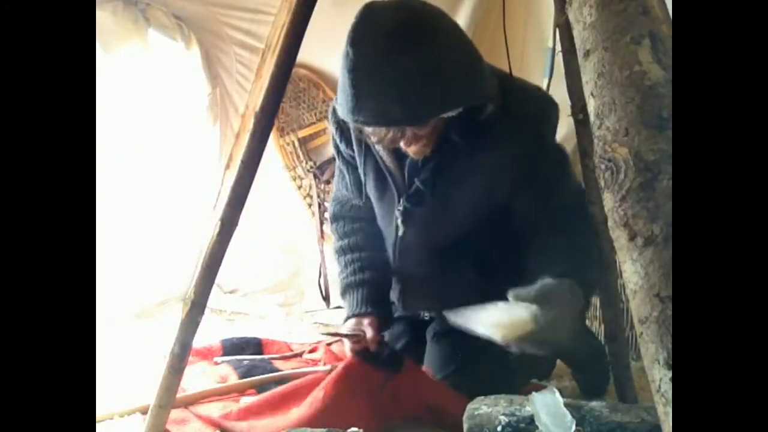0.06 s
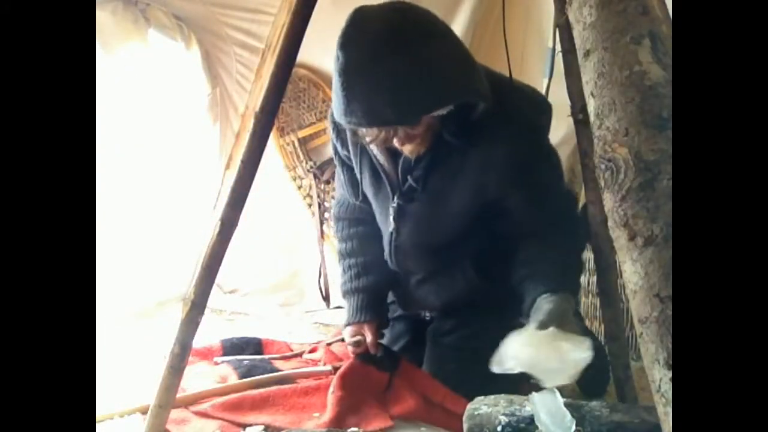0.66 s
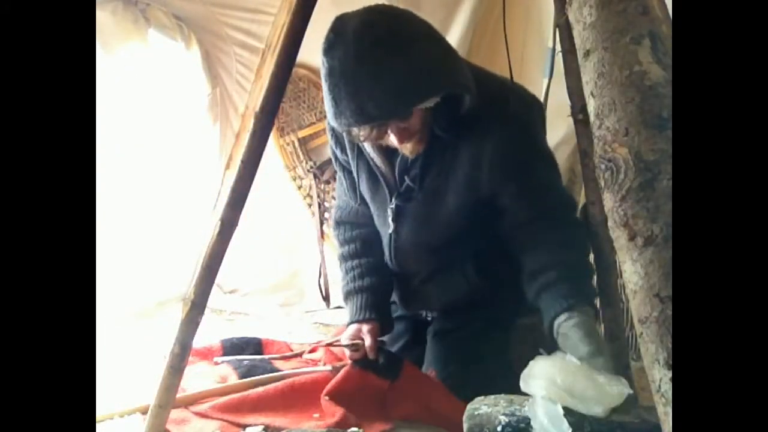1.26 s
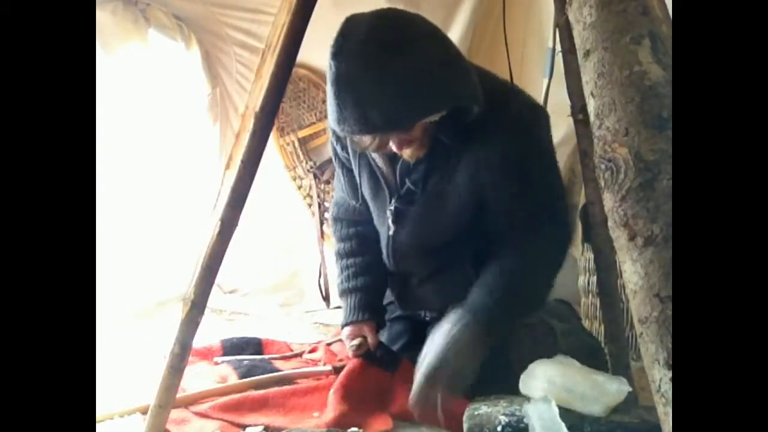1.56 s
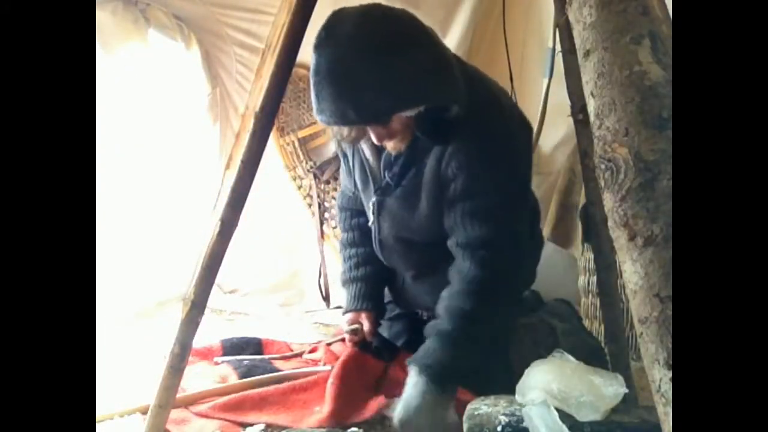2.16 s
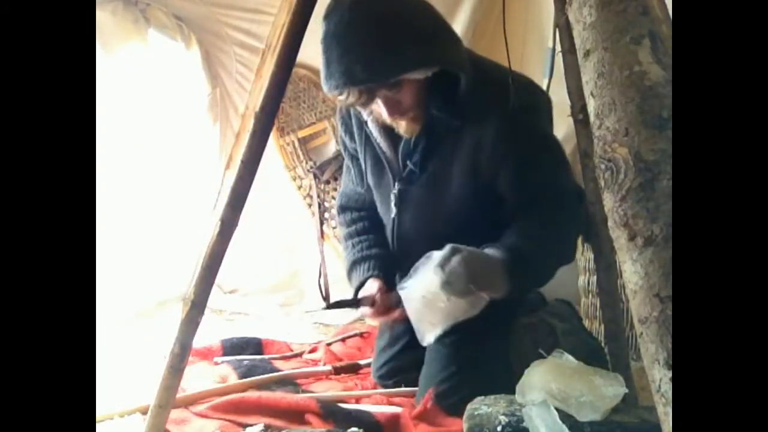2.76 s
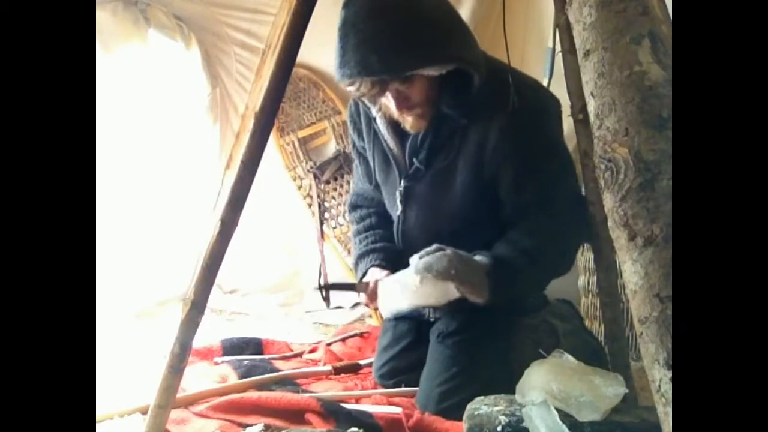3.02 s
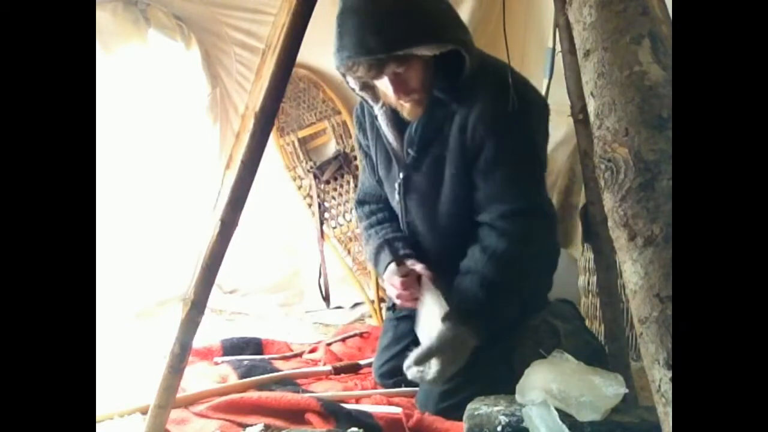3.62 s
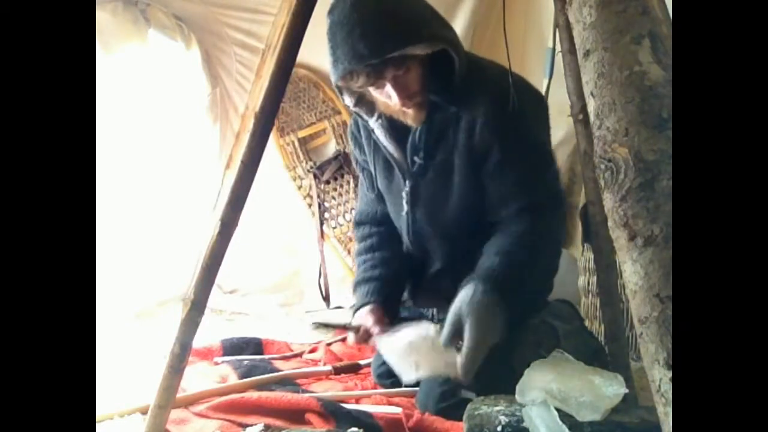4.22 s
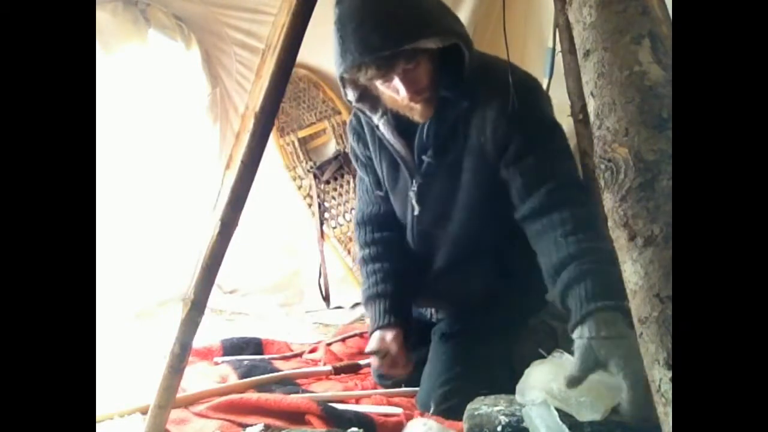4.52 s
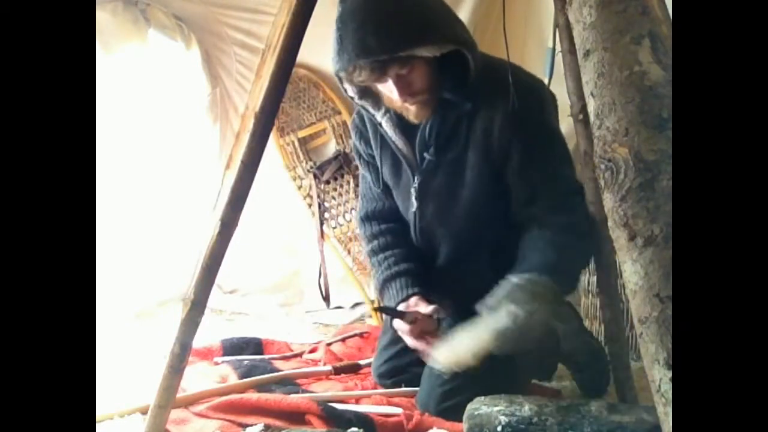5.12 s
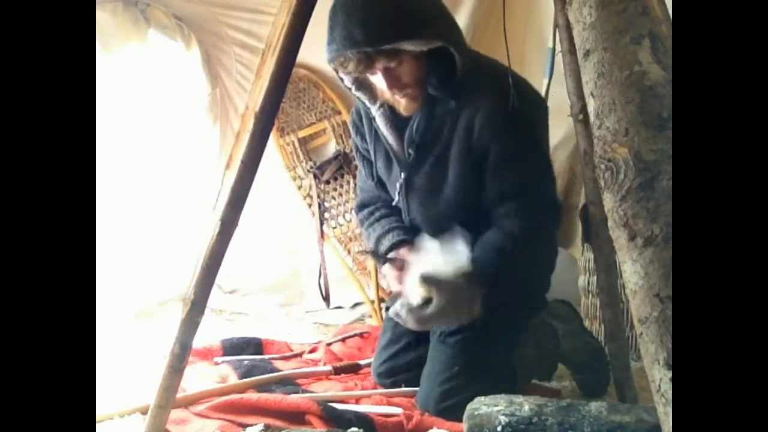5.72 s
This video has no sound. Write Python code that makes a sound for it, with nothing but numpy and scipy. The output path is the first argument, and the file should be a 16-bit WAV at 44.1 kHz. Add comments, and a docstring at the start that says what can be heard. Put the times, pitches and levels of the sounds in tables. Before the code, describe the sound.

A thick block of ice ticks and chips lightly at the start, then is set on a stone with a sharp, high clink at about 1.1 seconds, followed by dull knocks and short gritty scrapes until 1.7. Gloves and a heavy jacket rustle softly from 1.8 to 2.5. Faint ticks come near 3.1, and a knife taps a thin slab of ice at about 4.2. At 4.5 the slab hits the pile with the loudest sound, a bright, splintering crack, and its pieces bounce with brief ringing clinks and knocks. From 4.7 to 5.2 the block is dragged off the stone with scrapes, small tinks and glove rubbing. At 5.5 it strikes the knife with a strong, lower ringing clack, followed by two small snaps. Everything dies away quickly in the canvas shelter, over a quiet hiss and a faint low drone that swells near the end.

```python
"""Handling ice in a canvas shelter

A thick block scrapes and clinks as it is set down on a stone. A thin slab is picked up, touched with
a knife and tossed onto the pile, where it cracks and its pieces bounce, each ringing with its own notes.
The block is dragged off and knocks against the knife. Gloves rustle over a quiet hiss and a low drone."""
import sys
import numpy as np
from scipy import signal
from scipy.fft import rfft, irfft, next_fast_len
from scipy.io import wavfile
from scipy.ndimage import map_coordinates

SR = 44100
rng = np.random.default_rng(int(sys.argv[2]) if len(sys.argv) > 2 else 0)


def dump_mix(stems):
    """Bounce the given channels to the path in sys.argv[1] as a 16-bit WAV at rate SR."""
    frames = np.atleast_2d(stems).T  # one column per channel
    limited = np.clip(frames, -1, 1)  # hard clip at full scale
    pcm = np.round(limited * 32767).astype(np.int16)
    wavfile.write(sys.argv[1], SR, pcm)


N = 254898
TIME = np.arange(N) / SR
AGE = np.arange(SR // 4) / SR  # seconds since a hit


def amp(db):
    """Turn decibels into a gain."""
    return 10 ** (np.asarray(db) / 20)


def unit(x):
    """Scale a sound to an average power of 1."""
    return x / np.sqrt(np.mean(x ** 2) + 1e-20)


def fade(t60):
    """Die away by 60 dB in t60 seconds."""
    return np.exp(-np.log(1000) * AGE / t60)


def add(track, t, sound):
    """Mix a sound in at t seconds."""
    part = track[max(round(t * SR), 0):][:len(sound)]
    part += sound[:len(part)]


def shape(points, hz):
    """Read the gain at hz from a tone colour: a curve of level against frequency."""
    f, db = np.transpose(points)
    return amp(np.interp(np.log(hz + 1), np.log(f), db))


def filtered(x, response):
    """Scale each frequency in x by response(hz)."""
    size = next_fast_len(len(x) + 8192)
    return irfft(rfft(x, size) * response(np.fft.rfftfreq(size, 1 / SR)), size)[:len(x)]


def noise(response, size):
    """Filtered noise with a power of 1."""
    return unit(filtered(rng.standard_normal(size), response))


def wobble(rate):
    """A smooth curve through `rate` random values a second."""
    return map_coordinates(rng.standard_normal(int(N * rate / SR) + 4), [TIME * rate])


def grains(rate, spread_db):
    """About `rate` tiny random clicks a second, a few much louder than the rest."""
    clicks = rng.random(N) < rate / SR
    return clicks * rng.standard_normal(N) * amp(spread_db * np.minimum(rng.exponential(size=N), 3))


def ring(notes, vary_db, blur, build_t60):
    """A struck object's own notes die away; nearby echoes build each one up and make it waver."""
    hz, db, t60 = np.transpose(notes)[:, :, None]
    gain = amp(db + vary_db * rng.standard_normal(db.shape))
    waver = signal.resample(rng.standard_normal((len(notes), 2, 60)), len(AGE), axis=2)
    phase = 2 * np.pi * (hz * AGE + rng.random(hz.shape))
    tones = (1 + blur * waver[:, 0]) * np.sin(phase) + blur * waver[:, 1] * np.cos(phase)
    return np.sum(gain * fade(t60) * tones, axis=0) * (1 - fade(build_t60)) / np.linalg.norm(gain)


# Tone colour of the hiss: f/Hz, level/dB
HISS_COLOUR = [(30, -16.5), (80, -9.5), (130, -5.5), (225, -2), (360, -5), (700, -6.5), (1900, -12),
               (4000, -14), (6200, -14.5), (7700, -10), (9200, -19.5), (12000, -18), (15500, -15.5)]
# The drone's two notes: f/Hz, level/dB
DRONE_NOTES = [(134.6, -5.5), (215, -8.5)]
# How the drone dips and swells: t/s, level/dB
DRONE_SWELL = [(0, -69.5), (3.5, -76.5), (4.9, -65), (5.2, -62.5), (5.78, -62)]
def background():
    """A steady hiss and a low, slightly unsteady drone that swells near the end."""
    drone = sum(amp(db + wobble(5.2)) * np.sin(2 * np.pi * hz * TIME + 0.5 * wobble(10))
                for hz, db in DRONE_NOTES)
    swell = amp(np.interp(TIME, *np.transpose(DRONE_SWELL)))
    hiss = amp(-63) * noise(lambda hz: shape(HISS_COLOUR, hz), N)
    return hiss + np.sqrt(2) * swell * drone


def strokes(moves):
    """Loudness of movements that each speed up and slow down in one smooth arc."""
    return sum(amp(db) * np.cos(np.pi * np.clip((TIME - t) / length, -.5, .5)) for t, length, db in moves)


# Glove strokes and leans of the body: middle t/s, length/s, level/dB
GLOVE_STROKES = [(0.1, 0.15, -61), (0.28, 0.045, -70), (1.79, 0.099, -56), (1.89, 0.14, -54.5),
                 (2.01, 0.22, -57.5), (2.1, 0.075, -59.5), (2.18, 0.11, -58), (2.28, 0.11, -57),
                 (2.372, 0.067, -56.5), (2.48, 0.17, -64), (2.83, .1, -64), (3.485, 0.083, -58.5),
                 (3.75, 0.27, -65), (4.32, 0.18, -64), (4.67, 0.26, -46), (4.98, 0.52, -53.5),
                 (5.44, 0.14, -63), (5.6, 0.074, -54), (5.7, .14, -57.5)]
BODY_LEANS = [(0.1, 1.23, -68), (1.4, 1.1, -65), (2.4, 1.5, -73.5), (4.8, 1.67, -64), (5.7, 0.88, -69.5)]
# Tone colours of the gloves and the heavy jacket: f/Hz, level/dB
GLOVE_COLOUR = [(300, -3.5), (1500, -9.5), (3500, -8.5), (5500, -5), (7700, 6), (9200, -3.5), (12500, -8.5),
                (15500, -10)]
JACKET_COLOUR = [(70, -29), (150, -2), (220, 4), (320, -11.5), (500, -17), (1500, -25), (4000, -23.5)]
def clothing():
    """Gloves rub over frosty ice and a blanket in tiny slips; the jacket shifts as the body leans."""
    slips = grains(rate=5000, spread_db=2.2) * amp(2 * wobble(70))
    rub = unit(filtered(slips, lambda hz: shape(GLOVE_COLOUR, hz)))
    jacket = noise(lambda hz: shape(JACKET_COLOUR, hz), N)
    return strokes(GLOVE_STROKES) * rub + strokes(BODY_LEANS) * jacket


# Tone colour of a stone on soft ground: f/Hz, level/dB
THUD_COLOUR = [(50, -28), (110, -17), (200, -3.5), (290, -8.5), (400, -9.5), (620, -5), (950, -13.5),
               (1400, -3), (2100, -11.5), (5000, 10)]
# Notes of the stone rocking: f/Hz, level/dB, fade time/s
STONE_NOTES = [(205, -6, .1), (272, 0, .11), (325, -8, .08)]
def knock(bright_hz):
    """A dull blow clatters and rocks the stone. A softer blow is darker and thumps more."""
    thud = noise(lambda hz: shape(THUD_COLOUR, hz) / (1 + (hz / bright_hz) ** 4), len(AGE))
    clatter = thud * (fade(.075) + amp(-13) * fade(.16))
    thump_db = -8 - 7.5 * np.log2(bright_hz / 1000)
    thump = amp(thump_db) * ring(STONE_NOTES, vary_db=1, blur=.2, build_t60=.012)
    blow = (clatter + thump) * (1 - fade(.004))
    return blow / np.std(blow[:SR // 50])  # the first 20 ms set the level


# The ice coming to rest: t/s, level/dB, brightness/Hz
LANDINGS = [(0.103, -59.5, 2040), (0.62, -61.5, 1510), (1.187, -46.5, 1330), (1.197, -43.5, 340),
            (1.424, -54, 380), (4.528, -42.5, 696), (4.563, -46.5, 694), (4.575, -51, 700),
            (4.592, -45, 1290), (4.719, -48.5, 596), (4.983, -49.5, 332), (5.019, -54, 2400),
            (5.068, -53.5, 1800)]
def landings():
    """The weight of the ice knocks dully on stone, ground or hand."""
    out = np.zeros(N)
    for t, db, bright_hz in LANDINGS:
        add(out, t, amp(db) * knock(bright_hz))
    return out


# Light touches on the ice: t/s, f/Hz, level/dB
TOUCHES = [(2.172, 5480, -57.5), (3.139, 5460, -57), (3.166, 4940, -59), (3.482, 3380, -59),
           (4.736, 6220, -42), (4.848, 6180, -45), (4.857, 8000, -47), (5.008, 7900, -38),
           (5.021, 5070, -46.5), (5.046, 8030, -44), (5.081, 6200, -49), (5.229, 4270, -55)]
def tinks():
    """Each gentle touch sounds a single short note."""
    out = np.zeros(N)
    for t, hz, db in TOUCHES:
        add(out, t, amp(db) * ring([(hz, 0, .09)], vary_db=0, blur=.6, build_t60=.02))
    return out


def crack(colour, echo_db, echo_t60):
    """A sharp click, a moment of splintering, then echoes scattered by poles and canvas."""
    response = lambda hz: shape(colour, hz)
    click = filtered(1.0 * (np.arange(len(AGE)) == 20), response)
    splinters = .9 * fade(.004)
    echoes = amp(echo_db) * fade(echo_t60) * (1 - fade(.018))
    return 3.6 * click / click.max() + noise(response, len(AGE)) * (splinters + echoes)


# Tone colour of brittle ice cracking: f/Hz, level/dB
CRACK_COLOUR = [(80, -55), (300, -23), (600, -14.5), (950, -15), (1500, -17.5), (2400, -12), (4000, -10),
                (5500, -4.5), (7000, 2), (8200, 1.5), (9300, -5.5), (12000, -10), (15500, -10.5)]
# Edges breaking off: t/s, level/dB
EDGE_SNAPS = [(0.0434, -36), (1.0905, -30.5), (1.7357, -43), (2.7909, -46.5), (3.7935, -53), (4.159, -36),
              (4.4956, -21.5), (4.625, -40.5), (5.0802, -33.5), (5.58, -39.5), (5.628, -44.5)]
def snaps():
    """Thin edges chip off without ringing."""
    out = np.zeros(N)
    for t, db in EDGE_SNAPS:
        add(out, t, amp(db) * crack(CRACK_COLOUR, echo_db=-8.5, echo_t60=.074))
    return out


def clinks(hits, notes, colour, weight_db, build_t60, echo_db, echo_t60):
    """Each hit cracks and sets an object ringing, while its weight adds a knock."""
    out = np.zeros(N)
    for t, ring_db, crack_db in hits:
        tone = ring(notes, vary_db=1, blur=.45, build_t60=build_t60)
        body = tone + amp(weight_db) * knock(bright_hz=2080)
        add(out, t, amp(ring_db) * body + amp(crack_db) * crack(colour, echo_db, echo_t60))
    return out


# Notes of the thick block: f/Hz, level/dB, fade time/s
BLOCK_NOTES = [(4275, -19, .21), (6300, -9, .14), (6410, -15, .14), (7170, -3, .11), (7480, -8, .12),
               (7730, -8, .1), (7920, 0, .1), (8800, -13, .1), (12085, -24, .09)]
# Tone colour of its hard underside: f/Hz, level/dB
GRIT_COLOUR = [(300, -18), (2000, -18), (4300, -8), (5400, -38), (6300, 5), (7300, -0.5), (8000, 7),
               (8900, -2.5), (9700, -15), (12300, -8), (15500, -16)]
# Its taps on the stone: t/s, ring level/dB, crack level/dB
BLOCK_TAPS = [(0.0425, -49, -50), (0.616, -43, -59), (1.041, -46, -44), (1.0902, -29.5, -37.5)]
def block():
    """The thick block rings with high notes as it is set down."""
    return clinks(BLOCK_TAPS, BLOCK_NOTES, GRIT_COLOUR,
                  weight_db=-31, build_t60=.0025, echo_db=1.5, echo_t60=.18)


# The block sliding on the stone: t/s, length/s, level/dB
BLOCK_SCRAPES = [(0.021, 0.0081, -51.5), (1.051, 0.057, -49), (1.178, 0.042, -54), (1.29, 0.087, -61.5),
                 (1.358, 0.11, -55), (1.632, 0.072, -54.5), (4.754, 0.11, -56), (4.873, 0.093, -68),
                 (4.976, 0.027, -44.5), (5.063, 0.037, -48), (5.219, 0.027, -52)]
def scrapes():
    """The rough underside catches again and again; each scrape brings out a new mix of the notes."""
    out = np.zeros(N)
    for t, length, db in BLOCK_SCRAPES:
        strengths = amp(4 * rng.standard_normal(len(BLOCK_NOTES)))
        peaks = lambda hz: sum(gain * amp(level / 3) / (1 + 1j * (hz - note_hz) / 55)
                               for gain, (note_hz, level, _) in zip(strengths, BLOCK_NOTES))
        slips = grains(rate=1500, spread_db=2)[:len(AGE)]
        singing = unit(filtered(slips, lambda hz: peaks(hz) * shape(GRIT_COLOUR, hz) ** .4))
        gritty = unit(filtered(slips, lambda hz: shape(GRIT_COLOUR, hz)))
        push = np.interp(AGE, [0, .4 * length, length, length + .05], [0, 1, .7, 0]) ** 2
        add(out, t, amp(db) * push * (singing + amp(-14) * gritty))
    return out


# Notes of the block gripped against the knife: f/Hz, level/dB, fade time/s
HELD_NOTES = [(781, -16, .1), (1948, -18, .08), (2885, -8, .08), (3182, 0, .11), (3310, -12, .09),
              (4244, -10, .1), (5141, -15, .1), (6530, -14, .06), (6660, -15, .07)]
# Tone colour of a blunt hit: f/Hz, level/dB
CLACK_COLOUR = [(80, -38), (250, -10), (600, -3), (1000, -7), (1700, 1.5), (2700, 2.5), (3800, -4),
                (5500, -4.5), (6700, -2.5), (8000, -3.5), (9300, -13.5), (12000, -26), (15500, -34)]
# The bump on the knife: t/s, ring level/dB, crack level/dB
HELD_BUMP = [(5.4829, -22, -30)]
def held_block():
    """The gripped block clacks against the knife and rings with lower notes."""
    return clinks(HELD_BUMP, HELD_NOTES, CLACK_COLOUR,
                  weight_db=-33, build_t60=.045, echo_db=-4, echo_t60=.11)


# Notes of a knife tap: the blade's own notes, plus a 3186 Hz note from the slab it touches: f/Hz, level/dB,
# fade time/s
KNIFE_NOTES = [(2793, -11, .06), (3186, -15, .12), (6550, -8, .04), (6723, 0, .06), (6955, -9, .04)]
# Its taps on the slab: t/s, ring level/dB, crack level/dB
KNIFE_TAPS = [(4.1443, -33, -40.5), (4.1489, -38.5, -54)]
def knife():
    """The blade rings briefly as it touches the slab."""
    return clinks(KNIFE_TAPS, KNIFE_NOTES, CRACK_COLOUR,
                  weight_db=-25, build_t60=.0013, echo_db=-6, echo_t60=.08)


# Notes of two broken pieces: f/Hz, level/dB, fade time/s
SHARD_NOTES = [(1370, -15, .1), (3340, -9, .09), (3474, -7, .11), (5400, -8, .08), (5487, 0, .09),
               (5560, -9, .09), (6450, -11, .09), (7452, -11, .09), (8100, -7, .08), (10088, -8, .08)]
CHIP_NOTES = [(1523, -11, .09), (2589, -11, .08), (5060, -13, .08), (5910, 0, .1), (7633, -10, .08)]
# Their bounces: t/s, ring level/dB, crack level/dB
SHARD_BOUNCES = [(4.514, -17, -23)]
CHIP_BOUNCES = [(4.6702, -32.5, -35), (4.8897, -52, -75)]
def pieces():
    """A shard bounces off the pile with a sharp clink, then a chip with blunter ones."""
    shard = clinks(SHARD_BOUNCES, SHARD_NOTES, CRACK_COLOUR,
                   weight_db=-21.5, build_t60=.01, echo_db=-4.5, echo_t60=.15)
    chip = clinks(CHIP_BOUNCES, CHIP_NOTES, CLACK_COLOUR,
                  weight_db=-12, build_t60=.005, echo_db=-4.5, echo_t60=.11)
    return shard + chip


# The slab giving way: t/s, level/dB
SLAB_BREAKS = [(4.475, -20.5), (4.511, -33)]
def crunch():
    """A burst of tiny cracks swells and dies away each time the slab breaks."""
    cracks = grains(rate=4000, spread_db=2.5)
    burst = np.minimum(AGE / .0035, 1) * fade(.12)
    force = np.zeros(N)
    for t, db in SLAB_BREAKS:
        add(force, t, amp(db) * burst)
    return force * unit(filtered(cracks, lambda hz: shape(CRACK_COLOUR, hz)))


# Notes of the thin slab: f/Hz, level/dB, fade time/s
SLAB_NOTES = [(1290, -13, .08), (1795, -9, .09), (3320, -15, .11), (4797, 2, .085), (5000, -8, .06),
              (6240, -8, .05), (6680, -3, .06), (6896, -4, .05), (7525, -1, .06), (8171, -2, .06),
              (9118, -3, .06)]
# Its taps and its crash: t/s, ring level/dB, crack level/dB
SLAB_STRIKES = [(3.1385, -48, -46), (3.166, -51, -63), (4.1637, -43, -38.5), (4.1992, -48.5, -44),
                (4.4785, -12, -17), (4.5909, -43, -37)]
def slab():
    """The thin slab rings softly as it is handled, then loudly as it hits the pile."""
    return clinks(SLAB_STRIKES, SLAB_NOTES, CRACK_COLOUR,
                  weight_db=-25, build_t60=.0023, echo_db=-4, echo_t60=.12)


def scene():
    """Mix the ice, the knife, the clothes and the quiet shelter into one channel."""
    ringing = block() + slab() + knife() + pieces() + held_block()
    handling = snaps() + tinks() + crunch() + landings() + scrapes()
    return (ringing + handling + clothing() + background())[None]


def record(dry):
    """A small microphone loses the deep bass and the very highest treble."""
    bottom_hz, top_hz = 100, 15600
    thin = signal.sosfilt(signal.butter(4, bottom_hz, "highpass", fs=SR, output="sos"), dry[0])
    return filtered(thin, lambda hz: 1 / (1 + (hz / top_hz) ** 160))[None]


dry = scene()
out = record(dry)
dump_mix(out)
```